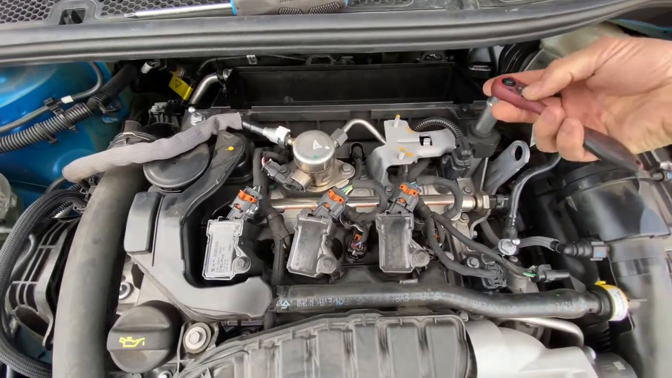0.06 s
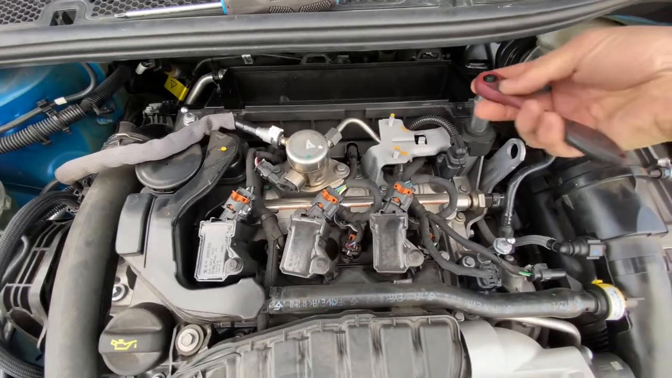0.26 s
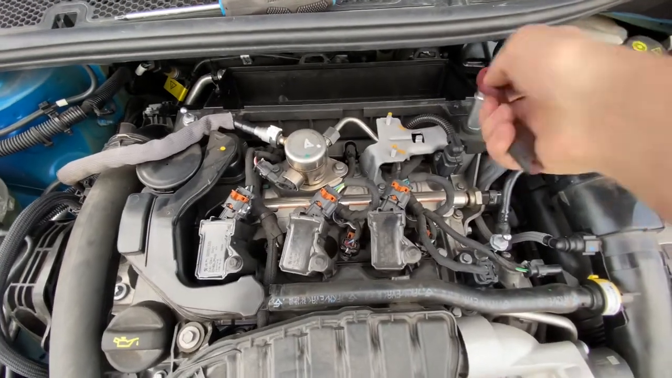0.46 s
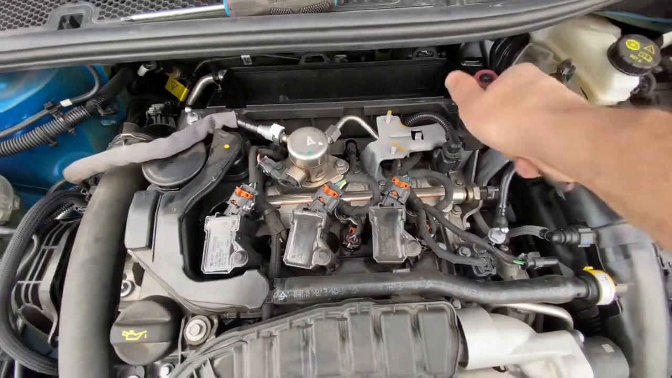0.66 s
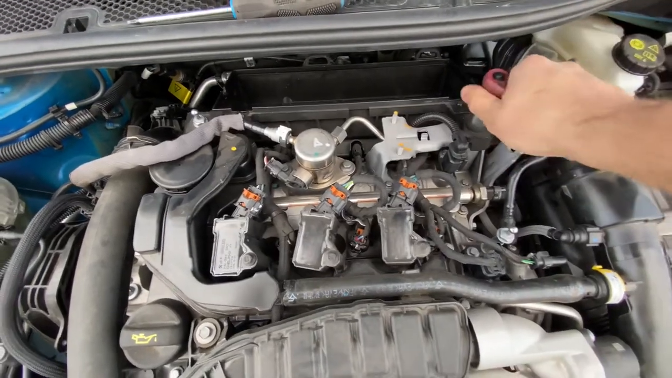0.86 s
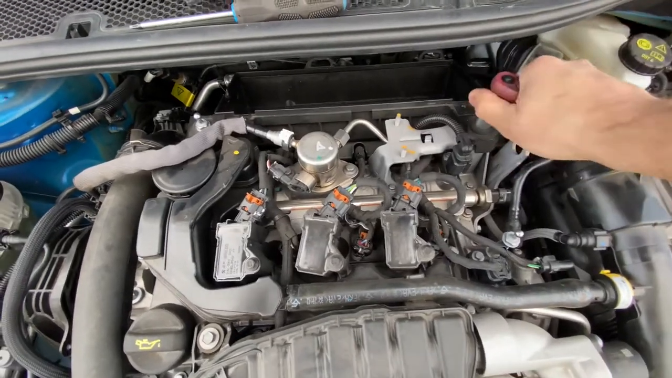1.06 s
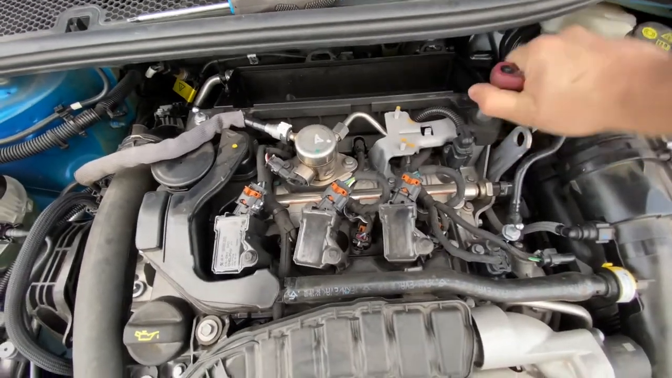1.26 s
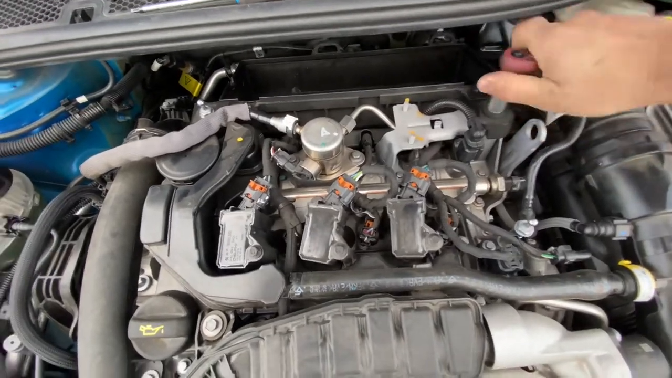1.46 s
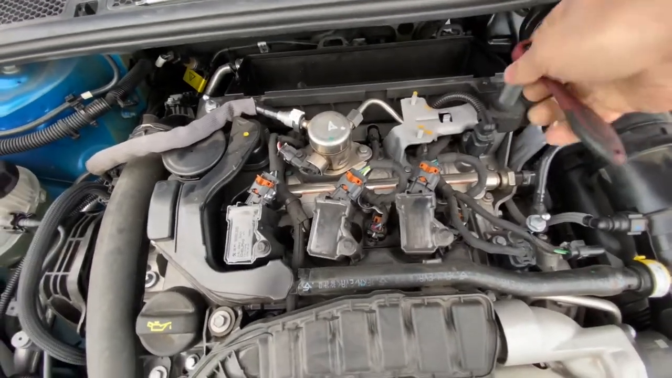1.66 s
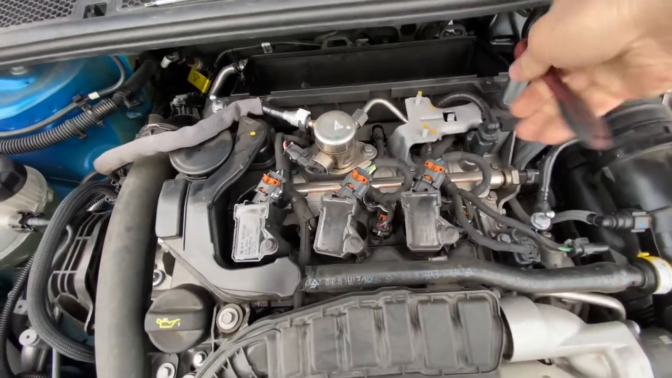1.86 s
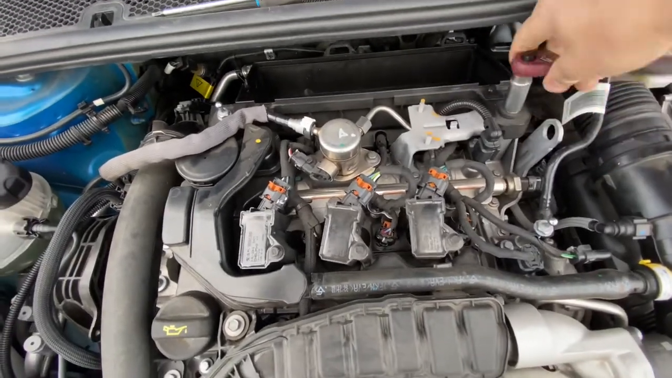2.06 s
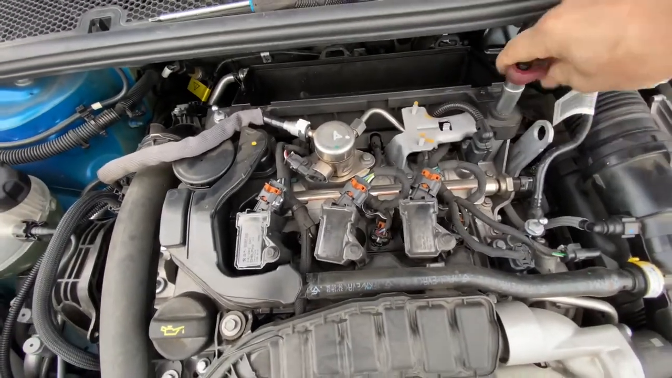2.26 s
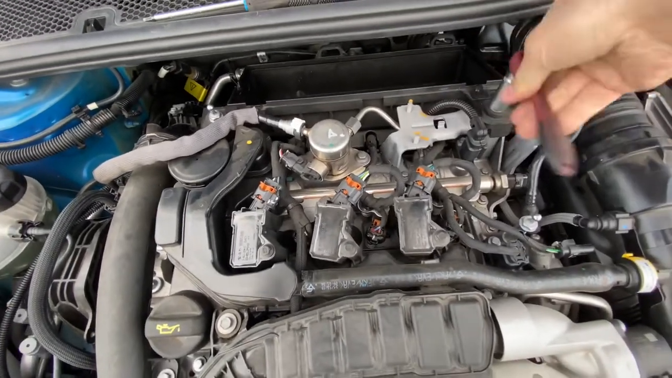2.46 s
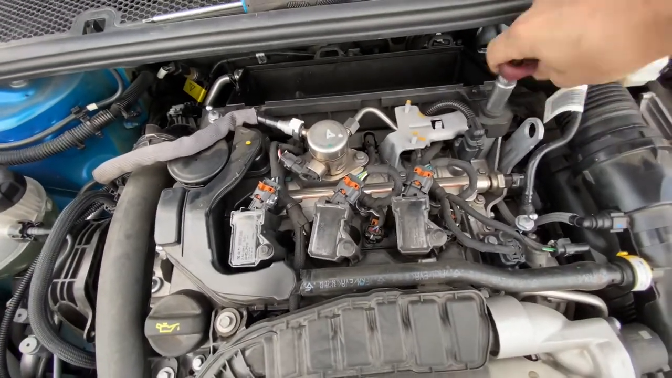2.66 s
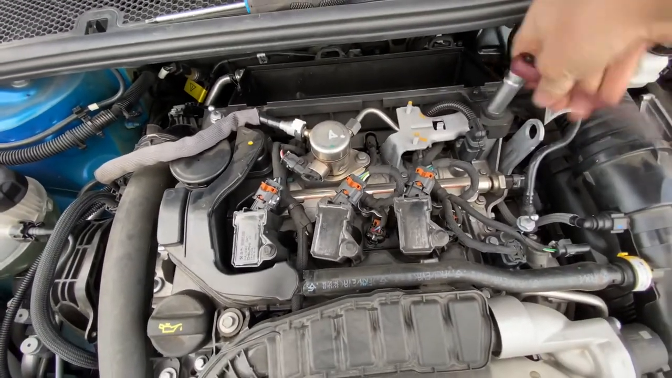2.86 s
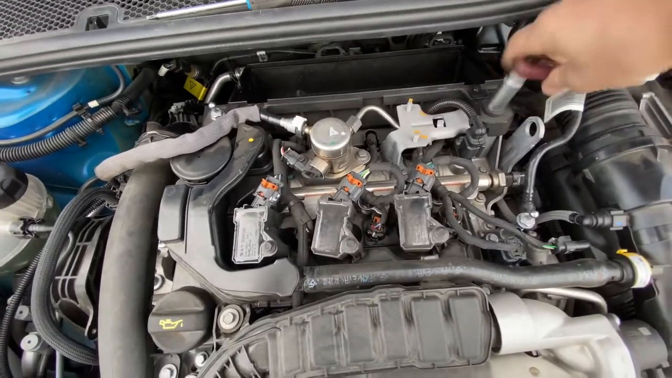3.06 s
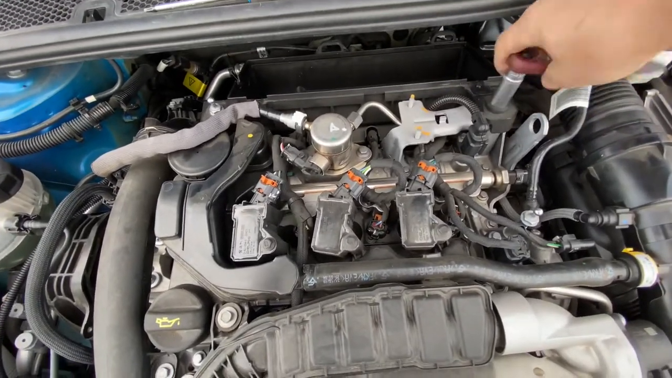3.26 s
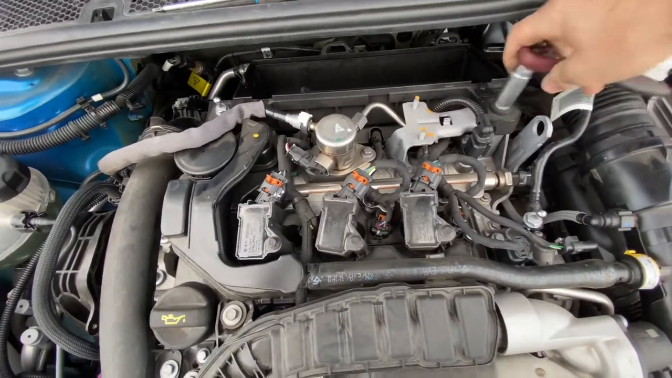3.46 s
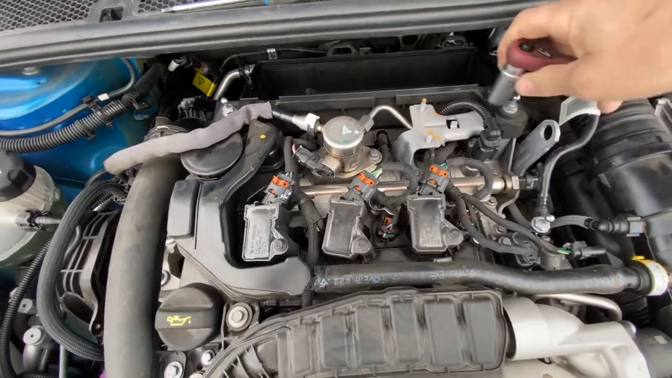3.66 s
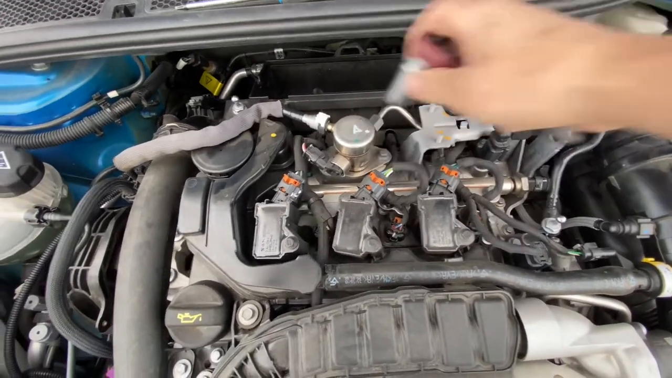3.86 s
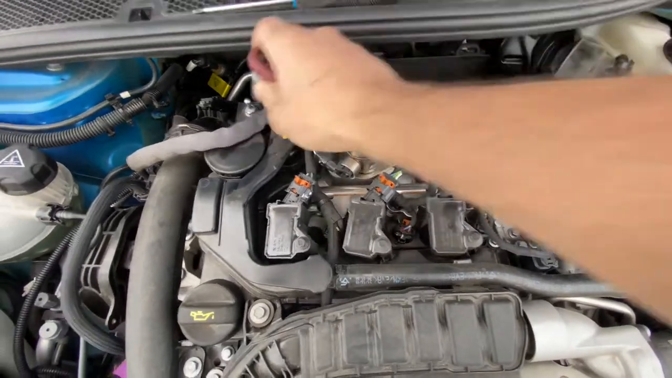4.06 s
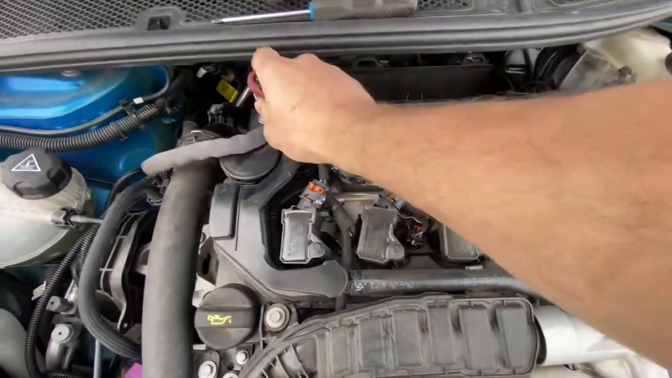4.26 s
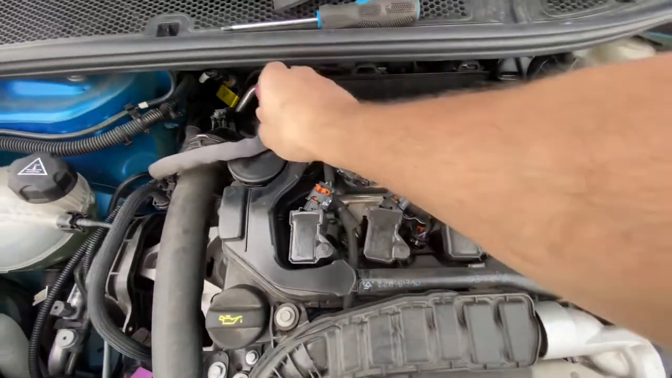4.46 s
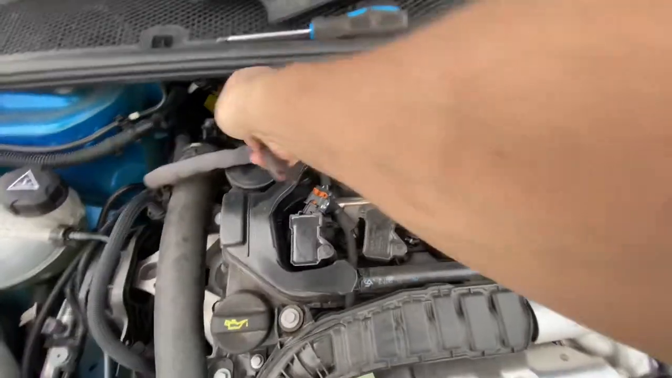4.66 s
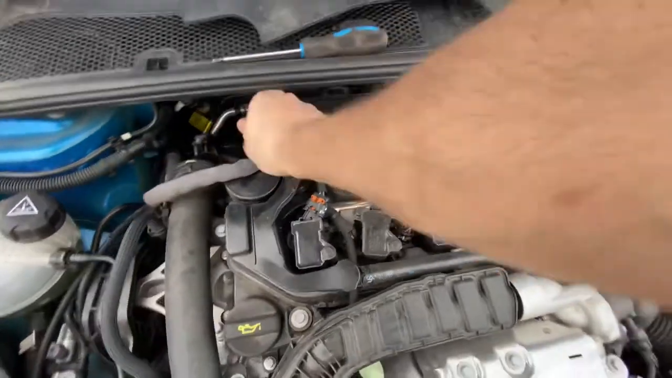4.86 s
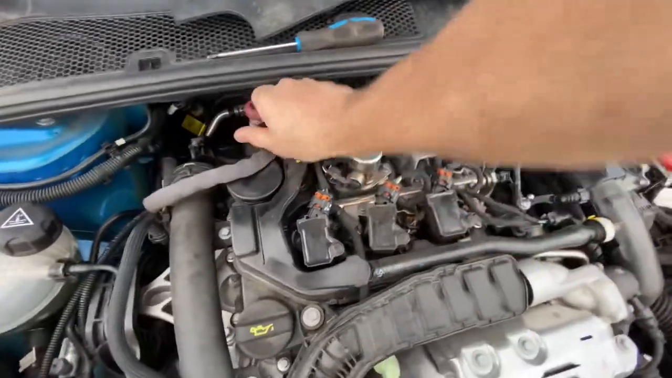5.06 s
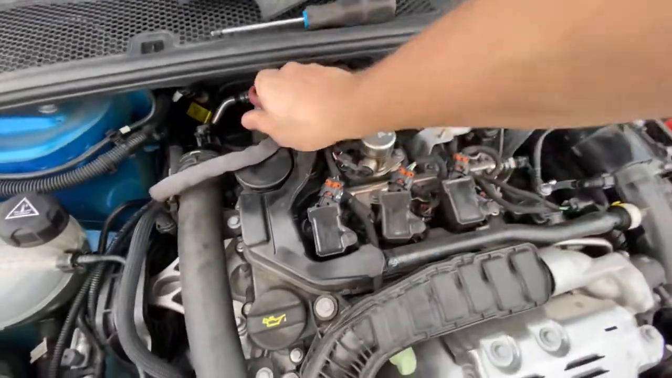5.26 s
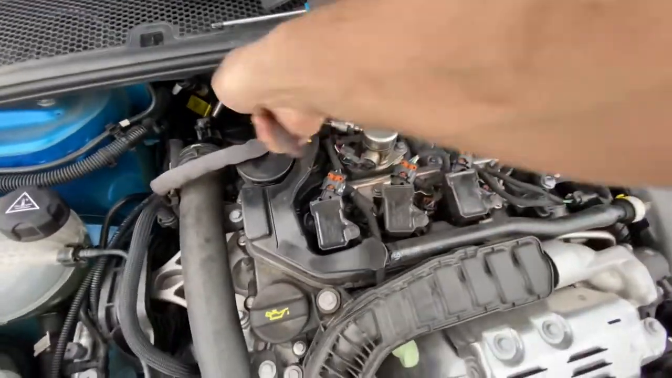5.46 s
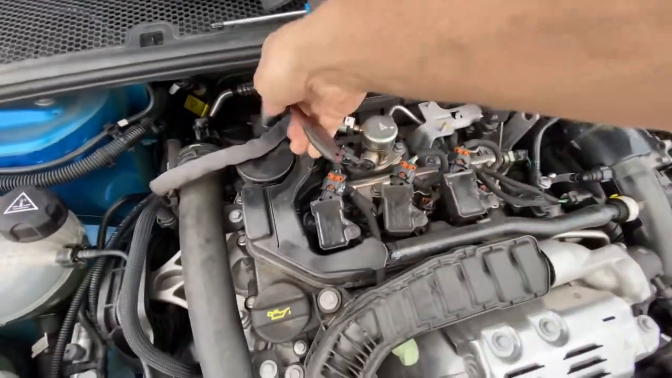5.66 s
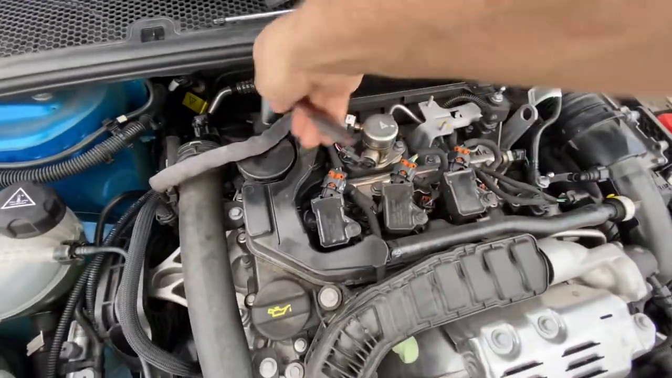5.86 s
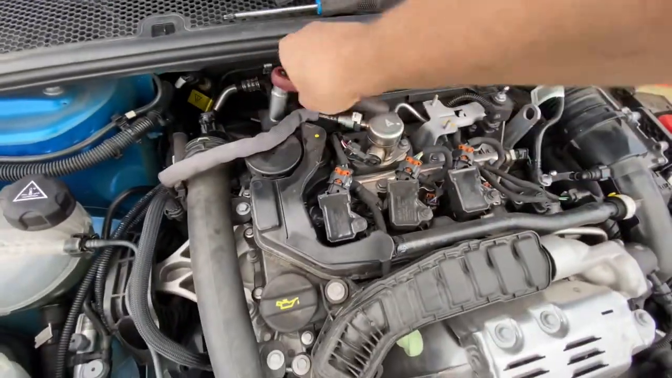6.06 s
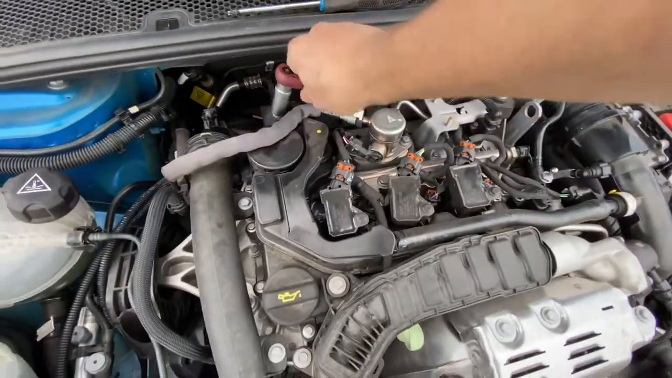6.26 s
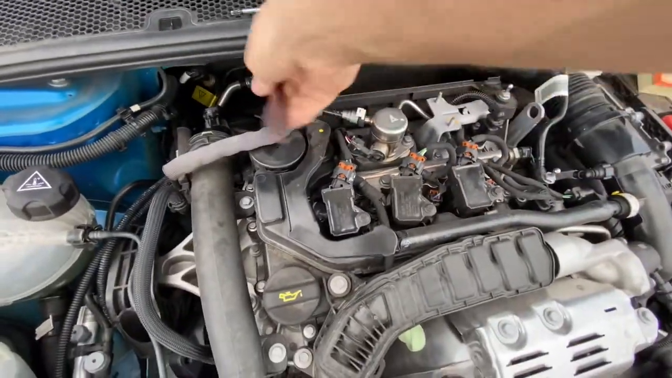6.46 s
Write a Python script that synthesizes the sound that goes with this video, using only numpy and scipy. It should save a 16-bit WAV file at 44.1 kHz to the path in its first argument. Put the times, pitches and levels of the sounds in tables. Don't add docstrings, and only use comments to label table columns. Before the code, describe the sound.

Outdoors by an open engine bay, recorded close on a small two-port microphone. From 0.2 to 0.55 s a ratchet gives a handful of hard, bright clicks and a knock, then only faint taps until about 1.4 s. Irregular clicks follow from 1.5 to 1.9 s. At 2.2 s a socket knock leads into a fast rasp of teeth; denser rasps come around 2.65 and 3.0-3.1 s, with hollow knocks between, thinning after 3.4 s. A lull lasts until 4.2 s, when sharp knocks seat the tool on a second bolt. Two clicks at 4.6 s, a short run at 5.25 s, scattered knocks and scrapes, a strong knock at 6.03 s, then a steady rattle of clicks from 6.25 to 6.45 s. Wind thumps and flutters heavily until 3.6 s, more gently later. Faint hiss, insect trill and distant low drone continue throughout.

```python
import sys
import numpy as np
from scipy import signal
from scipy.fft import rfft, irfft, next_fast_len
from scipy.io import wavfile
from scipy.ndimage import uniform_filter1d

SR = 44100
rng = np.random.default_rng(int(sys.argv[2]) if len(sys.argv) > 2 else 0)


def gain_from_db(level_db):
    decades = np.asarray(level_db, float) / 20
    return 10 ** decades


def bounce(signal):
    frames = np.transpose(np.atleast_2d(signal))
    limited = np.clip(frames, -1, 1)
    pcm = np.round(limited * 32767).astype(np.int16)
    wavfile.write(sys.argv[1], SR, pcm)


N = 287928
T = np.arange(N) / SR
MOVE_S = 3.9

# f/Hz, density/dB
AIR_COLOUR = [(88, -34.5), (150, 2.5), (680, -10), (1020, -8), (1360, -13.5), (3810, -18.5), (4470, -15.5),
              (10500, -43), (13600, -76.5), (17000, -120)]
# peak t/s, level/dB, flutter share/dB, fade/(dB per s)
GUSTS = [(.08, -41, 3.5, 50), (.44, -34, 0, 74), (.66, -32.5, -4, 197), (.74, -42.5, -10, 100),
         (1.13, -40, -17, 120), (1.28, -36.5, -1.5, 162), (1.55, -42, -12, 60.5), (1.88, -37.5, -1, 69),
         (2.11, -33, -1, 119), (2.6, -38, -0.5, 30), (2.86, -30.5, 0, 110), (3.18, -32, 3, 45),
         (3.55, -43.5, 0.5, 195), (4.63, -46, 2.5, 77), (5.06, -57, 22.5, 149), (5.3, -58.5, 14.5, 24),
         (5.39, -63, 8, 60), (5.5, -55, 8.5, 108), (5.79, -43.5, -2, 19), (6.05, -33.5, -6, 87),
         (6.4, -38.5, -9, 96), (6.53, -54.5, 29, 199)]
# f/Hz, density/dB
GUST_COLOUR = [(20, -36), (38, 4.5), (60, 3.5), (110, 5), (150, 0.5), (220, -59.5), (9500, -53),
               (11500, -110)]
FLUTTER_COLOUR = [(100, -30), (150, 0.), (280, -3), (400, -14), (750, -28), (1300, -68), (9500, -72),
                  (11500, -120)]
# t/s, level/dB, f/Hz, left over right/dB
BUFFETS = [(0.061, -30, 72, -16), (0.18, -29.5, 96.9, 9), (0.355, -24.5, 108, 12), (0.411, -24, 158, -9),
           (0.454, -29.5, 87, -8.5), (0.601, -28.5, 80, 8), (0.654, -41, 135, 0), (0.733, -32, 73.4, 6),
           (0.988, -42, 110, 10), (1.132, -33, 121, 9.5), (1.198, -27, 140, 0), (1.267, -37, 143, 0),
           (1.514, -41, 115, 8), (1.761, -33.5, 108, 11.5), (1.862, -33, 294, -5), (1.913, -35, 151, -16),
           (2.103, -26, 138, -15), (2.516, -24, 207, 6), (2.834, -23.5, 88, -12), (3.012, -29.5, 101, 9),
           (3.152, -21, 175, -7.5), (3.19, -23.5, 110, -14), (3.26, -34.5, 73, -10), (3.287, -32.5, 77, -7),
           (3.365, -25.5, 177, 6.5), (3.541, -35.5, 83.4, 4), (4.609, -36.5, 98, 13),
           (5.037, -27.5, 217, -3), (5.235, -29, 214, -3), (5.621, -33, 198, -5), (6.029, -35, 266, -3.5),
           (6.36, -26, 80, 7)]
# f/Hz, level/dB
MACHINE_TONES = [(53.8, -66), (91.5, -64), (134.6, -77.5)]

# t/s, handle level/dB, pawl level/dB
SNAPS_FIRST = [(0.214, -20, -14.5), (0.244, -19.5, -10), (0.3126, -13, -16), (0.369, -14.5, -15),
               (0.5013, -28, -21), (0.534, -16, -28.5), (0.96, -46.5, -47), (1.4723, -19, -16),
               (1.5, -39, -14), (1.5184, -22.5, -28), (1.539, -42.5, -12), (1.5671, -20.5, -14),
               (1.6076, -21, -23.5), (1.6389, -19.5, -19), (1.69, -22, -24), (1.8601, -16, -25),
               (2.323, -19, -24.5), (2.3395, -16, -12), (2.576, -22.5, -23.5), (2.7, -15.5, -12),
               (2.711, -19.5, -17), (2.724, -26.5, -15.5), (2.958, -21.5, -24), (3.3314, -23, -31),
               (3.3913, -20.5, -23), (3.642, -47.5, -55), (0.831, -44.5, -55), (.852, -69, -57),
               (.868, -71, -63), (.991, -47.5, -62), (1.072, -47.5, -59), (3.305, -50.5, -57),
               (3.735, -59, -59)]
SNAPS_SECOND = [(4.568, -15, -15.5), (4.5996, -17, -14), (4.885, -48, -42), (5.238, -20.5, -11),
                (5.2543, -16, -17.5), (5.268, -30, -10.5), (5.281, -21, -15), (5.293, -19.5, -21),
                (5.314, -27, -15), (5.344, -15, -23), (5.6898, -18, -14), (6.02, -18.5, -21.5),
                (6.244, -21.5, -18), (6.2583, -24, -20), (6.2731, -19.5, -25), (6.286, -23, -16.5),
                (6.301, -16, -36), (6.315, -23, -19), (6.3284, -18.5, -12), (6.3738, -22.5, -15),
                (6.389, -18, -21), (6.407, -35, -17.5), (6.446, -21.5, -22.5), (5.897, -33.5, -51)]
# t/s, handle level/dB, pawl level/dB
BACK_SWINGS = [(2.229, -34.5, -29.5), (2.238, -18.5, -20.5), (2.249, -19, -19.5), (2.2583, -22.5, -13),
               (2.2684, -18.5, -16), (2.2745, -33, -17.5), (2.283, -20.5, -20.5), (2.291, -24, -17.5),
               (2.298, -24.5, -17), (2.309, -20, -15.5), (2.6471, -18, -13), (2.652, -22.5, -22),
               (2.659, -17.5, -26.5), (2.667, -19.5, -12.5), (2.671, -15, -16), (2.677, -13.5, -18),
               (2.685, -14.5, -23), (2.698, -29.5, -31.5), (3.002, -24.5, -25.5), (3.006, -20.5, -17.5),
               (3.0105, -23, -16), (3.019, -28, -17.5), (3.028, -13.5, -13.5), (3.035, -23, -17.5),
               (3.041, -14, -18), (3.045, -28.5, -22), (3.054, -38, -44.5), (3.0687, -16, -27.5),
               (3.077, -14, -20), (3.082, -18, -10), (3.0898, -23, -15.5), (3.1017, -27, -14)]
# t/s, handle level/dB, cover level/dB, hollow level/dB
SOCKET_KNOCKS = [(0.4871, -23.5, -16, -26.5), (1.8481, -25.5, -26, -36), (1.867, -25, -21, -34.5),
                 (1.873, -32.5, -34, -31), (2.184, -24, -24.5, -37.5), (2.1907, -10.5, -13, -23.5),
                 (2.4413, -21, -49, -55), (2.4518, -24.5, -23, -28.5), (2.7943, -17.5, -23, -31),
                 (2.9846, -24.5, -26, -34.5), (3.128, -10, -17, -23.5), (3.1594, -20.5, -20.5, -27),
                 (4.1916, -9.5, -16.5, -62), (4.3051, -13.5, -13, -54), (4.326, -17.5, -15, -37),
                 (4.3281, -10.5, -18.5, -31.5), (4.5362, -33, -22, -32.5), (4.55, -31.5, -42, -27.5),
                 (4.8059, -36, -27, -44), (5.189, -32, -25, -66), (5.434, -16, -28.5, -36.5),
                 (5.4709, -21.5, -28.5, -33), (5.617, -32, -20, -43.5), (5.6849, -49, -24.5, -55),
                 (5.7684, -31, -16.5, -32.5), (5.817, -53, -25.5, -62), (5.8423, -65, -28.5, -65),
                 (6.0328, -10, -13, -23.5), (6.098, -25.5, -27.5, -36), (6.3491, -13, -18, -33.5),
                 (6.4364, -24.5, -28.5, -47), (6.5, -19.5, -15.5, -43)]
# t/s, handle level/dB, cover level/dB
TAPS_FIRST = [(0.1426, -25, -31.5), (0.2668, -42, -32.5), (0.5576, -35, -28), (0.6555, -57, -46),
              (0.706, -70, -43), (0.7143, -43.5, -32), (0.897, -71, -53), (1.1628, -62, -43),
              (1.195, -52, -45.5), (1.2698, -47, -41.5), (1.3608, -45, -30.5), (1.3939, -39.5, -32.5),
              (1.8416, -35, -34.5), (2.054, -40.5, -33.5), (2.4268, -44, -38), (2.5875, -31, -30),
              (2.5973, -28.5, -30), (2.6163, -25.5, -25), (2.7707, -28.5, -31.5), (2.8218, -34.5, -28),
              (2.9512, -35, -28), (3.35, -63, -44), (3.3725, -42.5, -32.5), (3.4445, -42.5, -41.5),
              (1.298, -60, -57), (2.125, -63, -50.5), (3.514, -45, -47), (3.54, -36, -41),
              (3.548, -57.5, -42)]
TAPS_SECOND = [(4.132, -69.5, -51), (4.214, -49, -36.5), (4.289, -36, -40), (4.458, -67, -35),
               (4.5017, -39.5, -38.5), (4.623, -32.5, -47), (4.6486, -45, -40), (4.7047, -42.5, -58),
               (5.033, -37, -31.5), (5.0464, -39, -37), (5.1632, -34, -29.5), (5.213, -33, -35.5),
               (5.2285, -48, -30), (5.4121, -41, -38.5), (5.46, -41, -37), (5.4987, -43, -37),
               (5.604, -53.5, -39), (5.776, -40, -28), (5.8221, -54, -30), (5.52, -45.5, -40),
               (5.789, -52, -31.5), (6.232, -56, -40), (5.9405, -62, -34.5), (6.178, -39, -48),
               (6.1968, -28, -27), (6.4545, -38, -47)]
# f/Hz, width/Hz, level/dB
PAWL_MODES = [(8000, 900, -2), (8310, 960, 31.5), (9970, 400, 43), (10410, 500, 30.5), (14500, 2600, 27)]
HANDLE_MODES = [(3000, 400, -7), (3700, 400, -5), (4300, 400, -1), (4850, 400, 0.), (5700, 550, -5),
                (6600, 650, -7)]
COVER_MODES = [(670, 140, 5), (761.5, 57, -6), (979, 27.3, 2.5), (1220, 190, 3.5), (1834, 690, -1.5),
               (2400, 125, -8), (2900, 540, 6.5)]
HOLLOW_MODES = [(522.5, 60, -1.5), (335.4, 47, -1)]

# t/s, level/dB, t60/s
COVER_HUMS = [(.142, -48.5, 0.18), (.266, -43.5, 0.23), (.357, -42.5, .2), (.487, -33, 0.16),
              (.558, -39, 0.19), (.655, -48.5, 0.23), (.706, -43, 0.19), (.722, -44.5, 0.22),
              (1.19, -56, 0.18), (1.27, -54.5, 0.17), (1.361, -42.5, 0.19), (1.394, -47.5, 0.21),
              (1.5, -50, 0.26), (1.55, -47, .25), (1.69, -50.5, .3), (1.845, -41.5, .2), (1.873, -35, 0.14),
              (2.056, -41.5, 0.2), (2.195, -31.5, 0.36), (2.452, -34, .2), (2.51, -40.5, .2),
              (2.59, -41, 0.27), (2.68, -40.5, 0.24), (2.794, -36.5, .3), (2.825, -34, 0.16),
              (2.958, -38, 0.27), (3.02, -35, .3), (3.07, -31.5, 0.2), (3.14, -34, 0.22), (3.372, -52, .25),
              (3.405, -48.5, .25), (4.192, -37, 0.19), (4.305, -37.5, 0.17), (4.326, -39, 0.18),
              (4.458, -53.5, .2), (4.545, -33.5, 0.18), (4.648, -43, 0.22), (4.806, -52.5, 0.19),
              (5.046, -48, .25), (5.163, -50, .2), (5.24, -46, 0.15), (5.434, -43, 0.27),
              (5.471, -43, 0.24), (5.615, -47, 0.17), (5.685, -50.5, .2), (5.772, -40, .2),
              (6.033, -31.5, 0.2), (6.1, -46, .25), (6.197, -47.5, .2), (6.35, -43.5, .3)]
# t/s, f/Hz, level/dB, t60/s
STEEL_PINGS = [
    (5.346, 1930, -56, 0.33),
    (6.1, 3720, -54, 0.34),
    (0.565, 4700, -65, 0.32),
    (.99, 5100, -71, .5),
    (0.59, 630, -46, .2),
    (.715, 750, -52, .2),
]
# peak t/s, level/dB, brightness/dB, fade/(dB per s)
RUBS = [(.17, -62.5, -11, 124.5), (.28, -49, -15, 64), (.57, -53.5, -18, 204), (.54, -62.5, -5, 34),
        (1.52, -53, -12.5, 28.5), (1.83, -53, -11.5, 119), (1.865, -52, -4.5, 262), (2.21, -35.5, -18, 313),
        (2.28, -67.5, 30.5, 203), (2.45, -41, -12.5, 142), (2.68, -45.5, -2.5, 65),
        (3.04, -31, -7.5, 170.5), (3.39, -45.5, -15.5, 125.5), (3.545, -61, 7, 170), (.44, -48, -17, 57),
        (.71, -56, -15, 118.5), (4.19, -51.5, -10, 401), (4.33, -41, -16.5, 163), (4.52, -55, -15.5, 31),
        (4.78, -56, -16.5, 24), (5.04, -43, -9, 248), (5.2, -54.5, -12, 17), (5.39, -56, -17, 63),
        (5.615, -43.5, -13, 352), (5.77, -45, -19, 348), (5.82, -62, 3, 99), (6.04, -52, -15, 43),
        (6.19, -52, -15, 300), (6.3, -55, -10, 22)]
# f/Hz, density/dB
RUB_COLOUR = [(200, -29), (400, 3.5), (700, 1), (1600, -9.5), (3000, -8.5), (7400, -27.5), (10300, -23.5),
              (11500, -52.5)]
# f/Hz, width/Hz, level/dB
RUB_RINGS = [(449, 30, 2.5), (755, 110, -15.5), (3900, 81, -9), (5870, 590, -5), (11000, 510, 2)]

# f/Hz, t60/s
BAY_DECAY = [(300, .09), (2000, .05), (12000, .015)]
# f/Hz, phase/rad
PORT_LEAD = [(0, 0), (430, 0.0), (690, -3.6), (1460, -5.6), (2670, -3.3), (3270, -3.6), (4050, -5.4),
             (4740, -3.8), (5250, 0.0), (5510, 0.3), (7490, 0.6), (8270, 1.5), (11000, 2.5), (12200, 3.05),
             (16500, 3.14)]
# f/Hz, level/dB
PORT_TILT_FIRST = [(60, -12.5), (130, -5), (290, -8.5), (640, -6.5), (1410, 0.5), (3100, -1), (6820, -2),
                   (15000, 3.5)]
PORT_TILT_SECOND = [(60, -13.5), (130, -0.5), (290, -7.5), (640, -4.5), (1410, -4.5), (3100, -4),
                    (6820, -2), (15000, 2)]


def evened(x):
    return x / np.sqrt(np.mean(x ** 2) + 1e-20)


def read(points, hz):
    f, value = np.transpose(points)
    return np.interp(np.log(hz + 1), np.log(f + 1), value)


def drifting(shape, samples):
    once = uniform_filter1d(rng.standard_normal(shape), samples)
    return uniform_filter1d(once, samples)


def noise(colour, patchy_db, size=1024, channels=1):
    hz = np.fft.rfftfreq(size, 1 / SR)
    draws = rng.standard_normal((3, channels, N * 4 // size + 5, len(hz)))
    a, b, patches = draws.transpose(0, 1, 3, 2)
    patches = evened(uniform_filter1d(uniform_filter1d(patches[0], 8, 0), 6, 1))
    z = (a + 1j * b) * gain_from_db(read(colour, hz)[:, None] + patchy_db * patches)
    return evened(signal.istft(z, nperseg=size, noverlap=size * 3 // 4)[1][:, :N])


def swells(rows, rise, steeper, rest_db, side_rest_db):
    s, db, side_db, fade = np.transpose(rows)[:, :, None]
    t = T[::64]
    slope_db = abs(fade * (t - s)) * np.where(t < s, rise, 1)
    layers = [(db - slope_db, rest_db), (db + side_db - steeper * slope_db, side_rest_db)]
    levels = []
    for layer_db, rest in layers:
        level = np.sqrt((gain_from_db(layer_db) ** 2).sum(0) + gain_from_db(rest) ** 2)
        levels.append(uniform_filter1d(np.interp(T, t, level), size=128))
    return levels


def wind():
    same = np.where(T < MOVE_S, .25, .85)
    lumps = evened(drifting((2, N), 900))
    push, flutter = swells(GUSTS, rise=1.24, steeper=2.35, rest_db=-67.5, side_rest_db=-81)
    pressure = evened(gain_from_db(2.2 * lumps) * noise(GUST_COLOUR, 1.5, size=2048, channels=2))
    ripple = evened(gain_from_db(4.5 * np.tanh(lumps)) * noise(FLUTTER_COLOUR, 2.5, channels=2))
    left, right = gain_from_db(-6) * push * pressure + gain_from_db(-5) * flutter * ripple
    return np.array([same * right + np.sqrt(1 - same ** 2) * left, gain_from_db(4.0) * right])


def thumps():
    turns, sag, level_db = 0.85, 0.12, -6
    out = np.zeros((2, N + 8192))
    starts = rng.uniform(0, 2 * np.pi, (len(BUFFETS), 2))
    for (s, db, hz, pan_db), start in zip(BUFFETS, starts):
        u = np.arange(8192) / SR * hz / turns
        port_phase = np.array([[0], [.2 * start[1]]])
        swing = np.sin(2 * np.pi * turns * u ** (1 - sag) + start[0] + port_phase)
        level = gain_from_db(db + level_db + pan_db * np.array([[.5], [-.5]]))
        out[:, round(s * SR):][:, :8192] += level * (u * np.exp(1 - u)) ** 2 * swing
    return out[:, :N]


def air():
    a, b = gain_from_db(-72) * noise(AIR_COLOUR, 2.5, channels=2)
    return np.array([1.9 * a + 0.2 * b, b])


def insect():
    turns = (32.5 * T) % 1
    chirp = np.maximum(np.cos(2 * np.pi * 4.066 * (T - .8)) + .3, 0)
    voices = [(4900 - 400 * turns, 0.), (4350 - 300 * turns, -6)]  # f/Hz, level/dB
    wobble_hz = 60 * evened(uniform_filter1d(rng.standard_normal(N), 300))
    song = sum(gain_from_db(db) * np.sin(2 * np.pi * np.cumsum(hz + wobble_hz) / SR) for hz, db in voices)
    return gain_from_db(-79) * evened(song * chirp ** 0.5 * np.sin(np.pi * turns) ** 2.5)


def drone():
    out = np.zeros(N)
    for hz, db in MACHINE_TONES:
        level_drift, pitch_drift = [evened(drifting(N, 3000)) for _ in range(2)]
        phase = 2 * np.pi * np.cumsum(hz + 4.7 * pitch_drift) / SR
        out += gain_from_db(db + 1.4 * level_drift) * np.sin(phase)
    return out


def body(modes, hz, luck, detune, uneven_db, blunt_hz):
    f, width, db = np.transpose(modes)[:, :, None]
    luck = luck[:len(f)]
    width = np.maximum(width, (f - 390) / 5.5)
    f = f * (1 + detune * luck[:, :1])
    resonance = 1j * hz * width / (f ** 2 - hz ** 2 + 1j * hz * width)
    ring = gain_from_db(db + uneven_db * luck[:, 1:]) * resonance * np.sign(luck[:, :1])
    return ring.sum(0) / (1 + 1j * hz / blunt_hz) ** 3


def contacts(rows, strike, rise, handle_pitch):
    out = np.zeros((2, N + 8192))
    t, hz = np.arange(4096) / SR, np.fft.rfftfreq(8192, 1 / SR)
    luck = rng.standard_normal((len(rows), 5, len(COVER_MODES), 2))
    shake = rng.standard_normal((len(rows), 4096))
    for (s, handle_db, pawl_db, cover_db, hollow_db, t60), u, rattle in zip(rows, luck, shake):
        fade = gain_from_db(-60 * t / np.clip(t60, .004, .2)) * (1 - np.exp(-t / rise))
        fade *= 1 + 1.1 * np.exp(-t / 0.00053)
        hit = strike * np.exp(-2j * np.pi * hz * 1.4 * rise)
        drive = hit + rfft(rattle * abs(rattle) ** 0.2 * fade, 8192)

        sharp = 1.12 if s > MOVE_S else 1
        pitch = handle_pitch if s > MOVE_S else 1
        pawl = [(f * sharp, width, db) for f, width, db in PAWL_MODES]
        handle = [(f * pitch, width, db) for f, width, db in HANDLE_MODES]
        # modes, level/dB, detune, unevenness/dB, bluntness/Hz
        parts = [(pawl, pawl_db, .05, 2.5, 16000),
                 (handle, handle_db - 1.5, .04, 2.5, 9000),
                 (COVER_MODES, cover_db - 2.1, .04, 2.5, 3500),
                 (HOLLOW_MODES, hollow_db - 5, .05, 1.5, 900)]
        sound = np.zeros(8192)
        for (modes, db, *touch), v in zip(parts, u):
            ring = irfft(drive * body(modes, hz, v, *touch))
            sound += gain_from_db(db) * ring / abs(ring).max()

        sway = gain_from_db(2.1 * u[4, 0, 0]) * np.exp(.3j * u[4, 0, 1])
        sway = sway ** (1.0 + 0.3 / (1 + (hz / 9000) ** 4))
        out[:, round(s * SR):][:, :8192] += [irfft(rfft(sound) * sway), sound]
    return out[:, :N]


def pawl_snaps():
    single = [(row, .011 if row[0] < MOVE_S else .0095) for row in SNAPS_FIRST + SNAPS_SECOND]
    hurried = [(row, .012) for row in BACK_SWINGS]
    rows = []
    for (s, handle, pawl), rattle_s in single + hurried:
        cover = max(handle, pawl) - 18
        rows.append((s, handle, pawl, cover, cover - 17, rattle_s))
    return contacts(rows, strike=3.1, rise=0.0007, handle_pitch=1.0)


def socket_knocks():
    rows = []
    for s, handle, cover, hollow in SOCKET_KNOCKS:
        jolt_db, rattle_s = (-3.5, .015) if s < MOVE_S else (-11, .01)
        rows.append((s, handle, 1.19 * handle + jolt_db, cover, hollow, rattle_s))
    return contacts(rows, strike=2.5, rise=.001, handle_pitch=.86)


def light_taps():
    rows = [(s, handle, handle - 22, cover, cover - 7.5, .03) for s, handle, cover in TAPS_FIRST + TAPS_SECOND]
    return contacts(rows, strike=.6, rise=.0015, handle_pitch=.68)


def rings():
    hum_hz, rise_s = 448, .008
    rows = [(s, hum_hz, db, t60) for s, db, t60 in COVER_HUMS] + STEEL_PINGS
    out, t = np.zeros(N + 16384), np.arange(16384) / SR
    for (s, hz, db, t60), u in zip(rows, rng.standard_normal((len(rows), 3))):
        turns = hz * (1 + .006 * u[0]) * t + .04 * np.sin(2 * np.pi * 22 * t + u[1])
        fade_db = 60 * (t / np.clip(.56 * t60, .05, .8)) ** 1.7
        level = gain_from_db(db - 5 - fade_db) * (1 - np.exp(-t / rise_s))
        out[round(s * SR):][:16384] += level * np.sin(2 * np.pi * turns + u[2])
    return out[:N]


def scrape():
    slips = gain_from_db(0.73 * np.minimum(rng.exponential(1, N), 5)) * (rng.random(N) < 1500 / SR)
    clumps = np.sqrt(0.31 + signal.oaconvolve(slips ** 2, np.exp(-np.arange(400) / 90))[:N] / 60)
    rub = noise(RUB_COLOUR, 2.5, size=256)[0] * clumps
    singing = [gain_from_db(db) * signal.lfilter(*signal.iirpeak(hz, hz / width, SR), rub)
               for hz, width, db in RUB_RINGS]
    rub = rub + sum(singing)
    rub = rub * gain_from_db(3.3 * evened(drifting(N, 700)))
    dull = signal.sosfilt(signal.butter(4, 5000, fs=SR, output="sos"), rub)
    bright = signal.sosfilt(signal.butter(4, 5000, "high", fs=SR, output="sos"), rub)
    press, sheen = swells(RUBS, rise=1.36, steeper=2.36, rest_db=-91.5, side_rest_db=-95)
    return gain_from_db(-2.0) * press * evened(dull) + gain_from_db(4.5) * sheen * evened(bright)


def bay(x):
    echoes = np.zeros((2, 12000))
    at = np.arange(60, 11980, 20) + rng.integers(0, 20, (2, 596))
    np.put_along_axis(echoes, at, rng.choice([-1., 1.], at.shape), 1)
    hz, t, z = signal.stft(echoes, SR, nperseg=128)
    tail = signal.istft(z * gain_from_db(-60 * t / read(BAY_DECAY, hz)[:, None]), SR, nperseg=128)[1]
    return signal.fftconvolve(x[None], tail / np.linalg.norm(tail[0]), axes=1)[:, :N]


def ports(x, tilt):
    size = next_fast_len(N + 4096)
    hz = np.fft.rfftfreq(size, 1 / SR)
    half = gain_from_db(read(tilt, hz) / 2)
    lead = np.interp(hz, *np.transpose(PORT_LEAD))
    turn = np.array([half * np.exp(1j * lead), 1 / half])
    return irfft(rfft(x, size) * turn, size)[:, :N]


def scene():
    tool = pawl_snaps() + socket_knocks() + light_taps() + scrape() + rings()
    sound = tool + gain_from_db(-9) * bay(tool[1]) + air() + insect() + drone()
    first_bolt = ports(sound * (T < MOVE_S), PORT_TILT_FIRST)
    second_bolt = ports(sound * (T >= MOVE_S), PORT_TILT_SECOND)
    return first_bolt + second_bolt + wind() + thumps()


def roll_off(x):
    return signal.sosfilt(signal.butter(12, 16840, fs=SR, output="sos"), x)


def record(dry):
    low_cut = signal.butter(4, 42, "high", fs=SR, output="sos")
    band_limit = signal.firwin(511, 16500, fs=SR)
    mix = signal.oaconvolve(signal.sosfilt(low_cut, dry), band_limit[None], "same")
    return roll_off(mix)


dry = scene()
out = record(dry)
bounce(out)
```